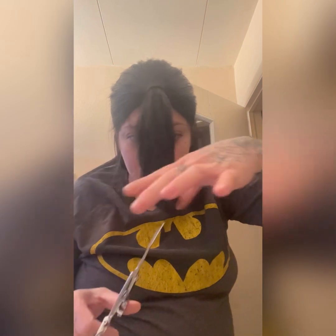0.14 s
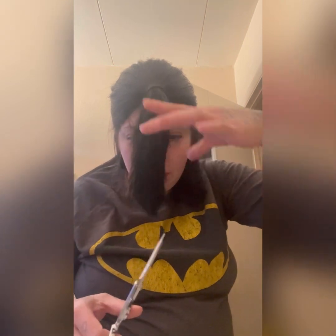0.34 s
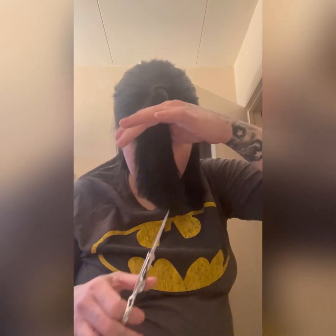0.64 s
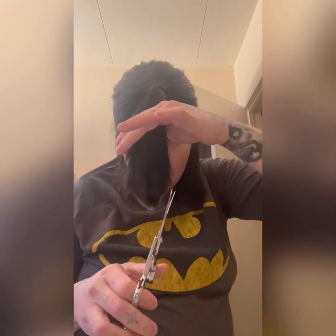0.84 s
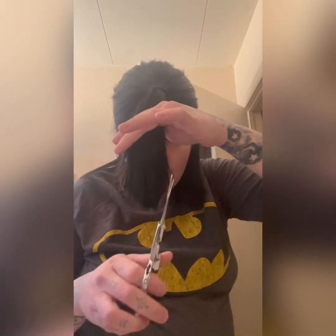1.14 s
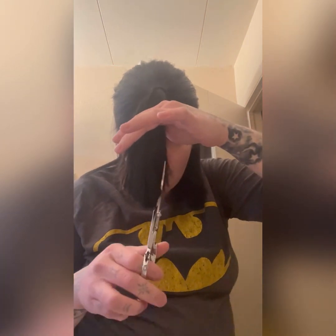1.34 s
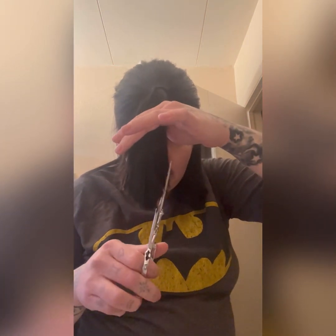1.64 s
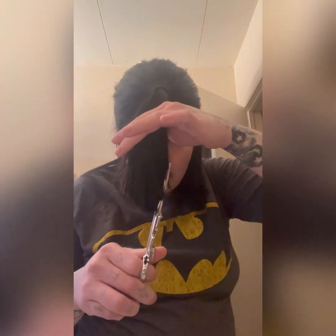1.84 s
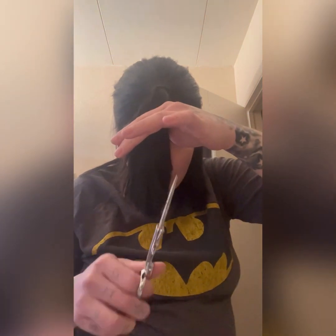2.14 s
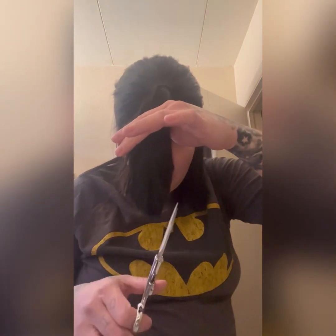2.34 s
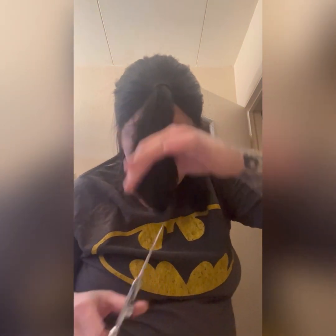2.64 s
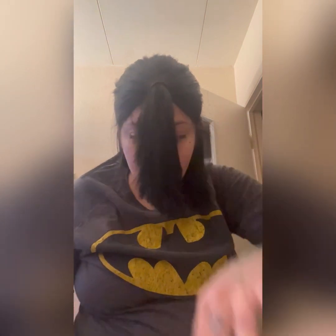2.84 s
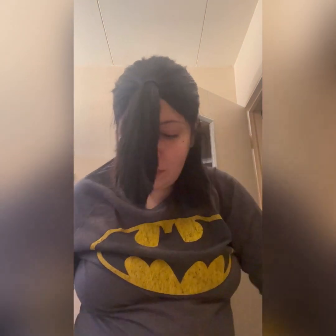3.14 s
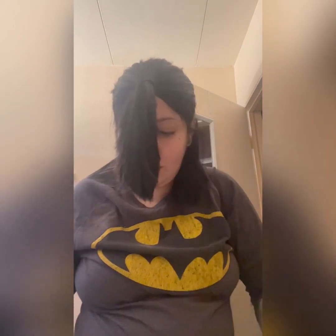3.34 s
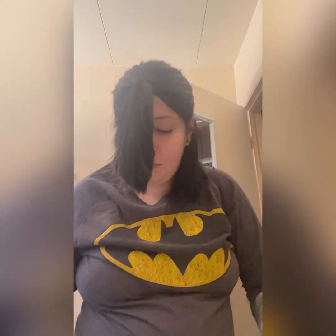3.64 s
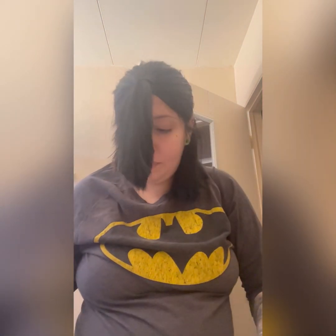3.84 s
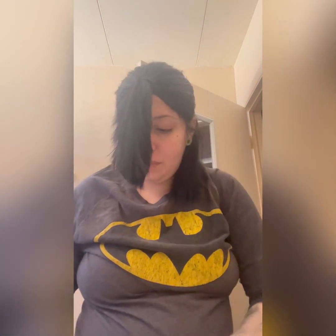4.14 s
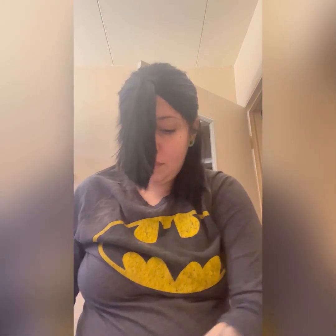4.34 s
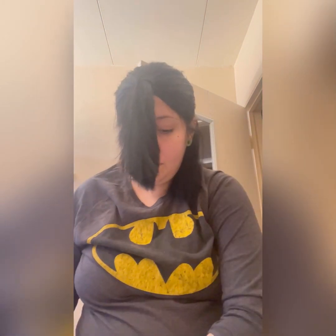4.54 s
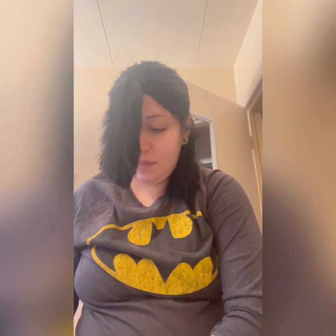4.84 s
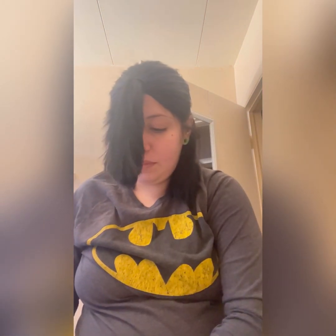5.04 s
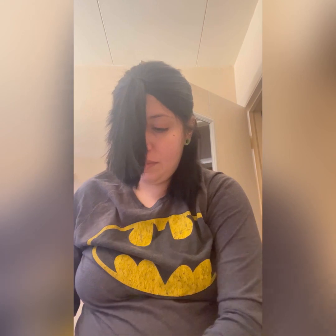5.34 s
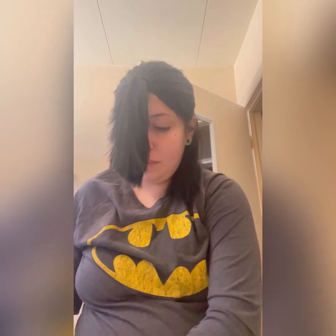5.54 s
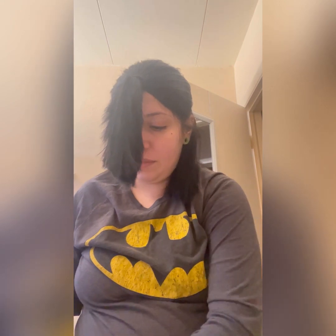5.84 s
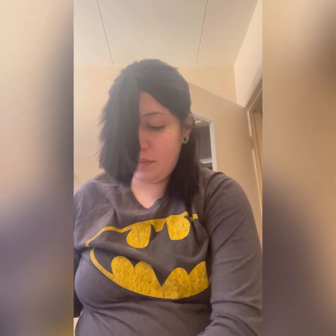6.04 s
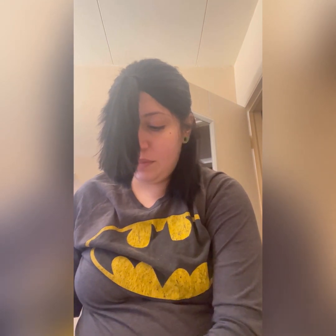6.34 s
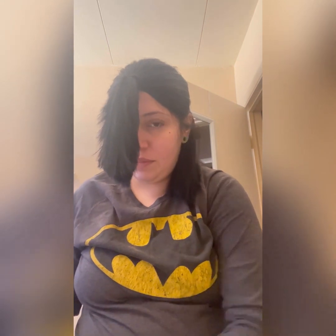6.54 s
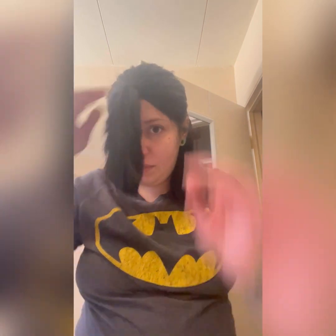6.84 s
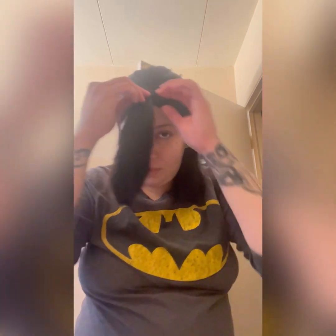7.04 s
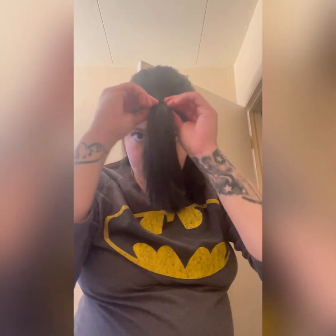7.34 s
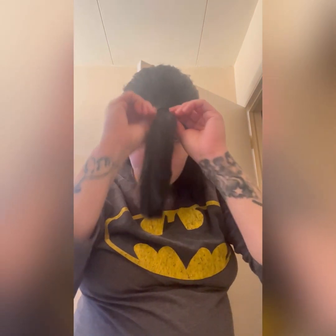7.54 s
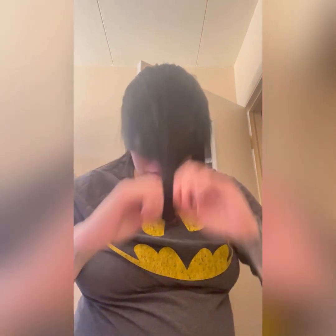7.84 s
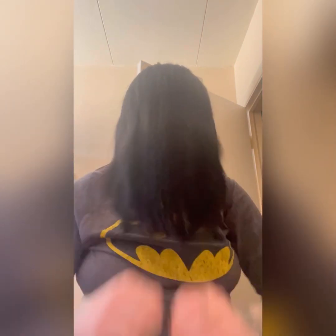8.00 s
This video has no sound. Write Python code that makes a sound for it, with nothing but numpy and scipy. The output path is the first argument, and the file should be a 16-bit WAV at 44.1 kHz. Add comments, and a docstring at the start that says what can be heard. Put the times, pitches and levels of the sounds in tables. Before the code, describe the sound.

Faint snipping of hair in a quiet bathroom, followed by loud close knocks and scrapes on a countertop, sleeve rustle and light hair smoothing.

```python
"""Scissors crunch slowly through a lock of hair and click shut in a small, quiet bathroom.
Random snaps make the crunch, gliding bands of noise the scrape, and struck steel modes the click.
Then hard things are put down and shifted on the counter where the phone stands: blows drive its modes.
Sleeves rustle and hands smooth the hair, both as filtered grains, and still air hisses softly.
A faint low hum, a sine with a weak third harmonic, wavers underneath and creeps up in pitch."""
import sys
import numpy as np
from scipy import signal
from scipy.fft import rfft, irfft
from scipy.io import wavfile
from scipy.ndimage import uniform_filter1d

SR = 44100
rng = np.random.default_rng(int(sys.argv[2]) if len(sys.argv) > 2 else 0)


def put_to_file(sound):
    """Save the sound as 16-bit audio at rate SR, in the file named by the first command-line argument."""
    columns = np.atleast_2d(sound).T  # one column per channel
    safe = np.clip(columns, -1, 1)
    whole_steps = np.round(safe * 32767)
    wavfile.write(sys.argv[1], SR, whole_steps.astype(np.int16))


N = 360297

# In spectra and modes, levels are relative: each source is scaled to its own level afterwards.

# level of the hum, joined by straight lines: (time [s], level [dB])
HUM_LEVEL = [(0.0, -61), (0.36, -58), (0.5, -62), (1.48, -55), (1.52, -69.5), (2.11, -56), (2.18, -70.5),
             (2.37, -57.5), (2.41, -77), (2.52, -54.5), (3.14, -73.5), (3.21, -57), (3.5, -60.5),
             (3.57, -77.5), (3.64, -61), (4.19, -70), (4.23, -77), (4.3, -61), (4.64, -59.5), (4.71, -80.5),
             (4.8, -57), (5.05, -68), (5.21, -63), (5.35, -75.5), (5.48, -56.5), (5.58, -71), (5.66, -52),
             (6.01, -73), (6.35, -54.5), (6.92, -68), (7.28, -59.5), (7.83, -65.5), (8.1, -58), (8.17, -67)]
# the hum's starting pitch, its climb and its random waver (rms)
HUM_HZ, HUM_RISE_HZ_PER_S, HUM_WAVER_HZ, HUM_WAVER_DB = 87.3, 2.4, 2.7, 1.5
# spectrum of the still air: (frequency [Hz], level [dB])
AIR_SPECTRUM = [(25, -9.5), (45, 0), (70, 9), (140, 4), (220, -9.5), (450, -14), (800, -24), (1300, -25),
                (1750, -26.5), (3000, -29), (6000, -35), (13000, -43.5), (15500, -58.5)]

# arm movements, each at its fastest:
# (time [s], attack [s], release [s], sleeve rub level [dB], body rumble level [dB])
ARM_MOVES = [(1.15, 0.44, 0.33, -97, -71.5), (1.32, 0.18, 0.59, -87.5, -77), (2.0, 0.51, 1.24, -98, -69),
             (2.85, 0.35, 0.27, -72, -76.5), (3.299, 0.13, 1.8, -62, -63.5), (3.698, .3, 1.1, -55, -68),
             (4.0, 0.75, 0.063, -60, -53.5), (4.401, 0.26, 0.48, -52, -54),
             (4.76, 0.43, 0.43, -61.5, -53.5), (5.5, 0.93, 0.84, -60, -54.5),
             (6.82, 0.43, 0.34, -58.5, -61), (7.28, 0.07, 1.02, -70, -60.5), (7.6, 0.47, 1.25, -58.5, -54),
             (8.09, 0.24, 0.25, -69.5, -55)]
REST_RUB_DB, REST_RUMBLE_DB = -89, -84  # while the arms are still
# spectrum of sleeves rubbing: (frequency [Hz], level [dB])
CLOTH_SPECTRUM = [(400, -4), (750, -3.5), (1100, -1.5), (1600, 6.5), (2000, 3), (2350, 6), (2750, -12.5),
                  (3500, -11.5), (5000, -22.5), (9000, -45), (15000, -35.5)]
# spectrum of the moving body's low rumble: (frequency [Hz], level [dB])
RUMBLE_SPECTRUM = [(25, -17), (65, 3), (130, -1), (200, -11.5), (285, 8), (350, -4), (520, -4), (750, -13),
                   (1200, -48)]
# a sleeve swishing past fast: (time [s], length [s], level [dB])
SWISHES = [(3.52, 0.049, -65), (6.78, 0.061, -82), (7.9, 0.11, -66.5)]
SWISH_ATTACK_S, SWISH_RELEASE_S = 0.2, 0.37
# spectrum of the swish's narrow hiss: (frequency [Hz], level [dB])
SWISH_SPECTRUM = [(1200, -27.5), (2300, -7), (2900, 6.5), (3400, 5.5), (3900, -16), (6000, -34)]

# the blades rubbing along the hair and each other:
# (time [s], length [s], start pitch [Hz], end pitch [Hz], level [dB])
SCRAPES = [(1.3, 0.051, 1650, 1420, -75.5), (1.42, .05, 1550, 1660, -85), (1.55, 0.077, 2050, 1864, -81.5),
           (1.575, .07, 6300, 6300, -86), (1.665, 0.053, 1743, 2055, -69), (1.675, .04, 6960, 7500, -78),
           (2.156, 0.063, 1820, 1700, -81), (2.823, .15, 1733, 1850, -77)]
SCRAPE_ATTACK_S, SCRAPE_RELEASE_S, SCRAPE_WIDTH_HZ = 0.034, 0.05, 310

# the blades pressing through a tuft: (time [s], length [s], level [dB])
CUTS = [(1.625, 0.023, -74), (1.68, 0.13, -76), (1.835, 0.016, -72.5), (1.925, 0.016, -62.5),
        (2.145, 0.019, -63.5)]
CUT_ATTACK_S, CUT_RELEASE_S = 0.023, 0.065
# spectrum of hair being cut: (frequency [Hz], level [dB])
CUT_SPECTRUM = [(400, -20), (1200, -11), (1600, 7), (2100, 10), (2700, -27), (3600, 6), (5000, -5.5),
                (7000, 0.5), (9000, -3), (11000, -3.5), (13500, 1.5), (15500, 1)]
# hair sliding through the fingers: (time [s], length [s], level [dB])
STROKES = [(2.922, 0.0087, -74.5), (2.99, 0.02, -60), (3.462, 0.011, -69.5), (7.015, 0.0042, -73.5),
           (7.07, .045, -79.5), (7.538, 0.0064, -61), (7.58, 0.26, -66.5), (7.78, 0.12, -63.5)]
STROKE_ATTACK_S, STROKE_RELEASE_S = 0.021, 0.044
# spectrum of hair being stroked: (frequency [Hz], level [dB])
STRAND_SPECTRUM = [(400, -56), (1300, 11), (2000, 16), (2800, 5.5), (3800, 16), (5200, 6.5), (7000, 6),
                   (9500, 4), (12000, 7), (15500, 5.5)]

# the blades catching and closing: (time [s], ring level [dB], hiss level [dB], chatter [s])
SNIPS = [(1.835, -63.5, -70, 0.026), (1.92, -56.5, -94, 0.017), (1.932, -64, -86, 0.012),
         (1.953, -62, -67, 0.0089), (1.975, -63, -65, 0.0027), (1.981, -55, -56, 0.008)]
# modes of the steel blades: (frequency [Hz], width [Hz], level [dB])
BLADE_MODES = [(1240, 50, 2), (1877, 33, 12), (2370, 330, 2), (3360, 680, 6.5), (6140, 470, -12),
               (10900, 300, -8), (13100, 320, -21)]

# things knocking on the counter: (time [s], thud level [dB], ring level [dB], crack level [dB],
# chatter [s], own note [Hz], own note level [dB])
KNOCKS = [(3.286, -73, -65, -105, 0.0043, 1930, -73), (3.505, -45.5, -39, -75, 0.0022, 2320, -44),
          (3.550, -54.5, -45, -80.5, 0.0046, 1940, -45), (3.582, -62, -53, -100, 0.0094, 940, -51),
          (3.626, -53.5, -64, -105, 0.0099, 466, -56), (3.701, -54.5, -69, -102, 0.0065, 2410, -56.5),
          (3.739, -49.5, -37.5, -59.5, 0.0084, 1220, -54), (3.7885, -42, -27, -37.5, 0.0022, 2353, -31.5),
          (3.795, -40, -29, -46.5, 0.0088, 868, -39), (3.812, -40, -47, -54, 0.0044, 1920, -39),
          (3.977, -75, -67.5, -105, 0.013, 442, -50.5), (3.997, -52.5, -55.5, -75, 0.0032, 2860, -57.5),
          (4.061, -57, -56.5, -100, 0.0055, 1390, -50.5), (4.078, -66, -67, -105, 0.0034, 1346, -55.5),
          (4.272, -43, -37, -56.5, 0.0085, 1662, -39), (4.387, -44, -37.5, -51.5, 0.0064, 810, -44),
          (4.459, -33, -11.5, -24, 0.0042, 2430, -38), (4.4671, -41, -25, -34, .0025, 3650, -40),
          (4.476, -39.5, -29, -39, 0.014, 2045, -27), (4.489, -38.5, -25.5, -44, 0.0053, 2150, -27.5),
          (4.536, -49.5, -53, -82, 0.017, 620, -42), (4.579, -59, -44.5, -82, 0.0078, 440, -52.5),
          (4.728, -65.5, -49, -90, 0.0029, 1510, -67), (4.926, -68.5, -68.5, -70, 0.0036, 1660, -57),
          (5.1735, -44, -32, -47, 0.0076, 822, -41), (5.180, -37.5, -24, -44, 0.011, 1712, -23),
          (5.35, -59, -50.5, -67, 0.016, 1310, -52), (5.379, -48, -36.5, -50.5, 0.011, 2230, -46),
          (5.412, -36.5, -28, -50, 0.0051, 2353, -32.5), (5.434, -48, -47, -58.5, 0.0092, 2060, -40),
          (5.463, -57, -45, -59, 0.0098, 1674, -40), (5.527, -42.5, -34.5, -45, 0.0082, 2370, -34.5),
          (5.585, -48.5, -42, -66, 0.0044, 1610, -39), (5.619, -51.5, -32, -53, 0.0077, 2440, -47.5),
          (5.742, -46.5, -33.5, -51.5, 0.009, 1570, -45), (5.762, -56, -37, -63, 0.004, 2200, -37),
          (5.841, -66, -49.5, -85, 0.011, 1800, -49), (7.265, -82.5, -69, -90, .008, 2063, -73),
          (7.691, -48, -55.5, -93, 0.0019, 560, -48), (7.692, -54, -62, -92.5, 0.0024, 1464, -49)]
# what the counter and the things on it ring with: (frequency [Hz], width [Hz], level [dB])
COUNTER_MODES = [(1634, 18, -12), (1702, 26, 1.5), (1738, 40, -3), (1834, 26, -9), (1866, 22, -14),
                 (2060, 12, -12), (2330, 85, -7.5), (2844, 260, -20.5), (3662, 40, -13.5),
                 (3890, 28, -24.5), (4119, 18, -25), (5315, 16, -22), (5820, 58, -33.5), (7060, 58, -26)]
# the duller modes of the counter top: (frequency [Hz], width [Hz], level [dB])
THUD_MODES = [(150, 22, -3), (278, 14, -12.5), (312, 14, -8), (398, 16, -3), (426, 23, -1.5),
              (480, 60, -6.5), (556, 11, -6.5), (640, 50, -7.5), (768, 99, 1.5), (826, 60, -3.5),
              (902, 45, -1.5), (1260, 25, -1)]
# spectrum of the crack of contact: (frequency [Hz], level [dB])
CRACK_SPECTRUM = [(300, -27.5), (1300, -15), (2400, -4.5), (3000, -2), (3800, 9.5), (5000, -4.5), (7000, 0),
                  (9000, -1), (12000, -12), (15500, -18.5)]
# spectrum of the fine tick of a hard edge: (frequency [Hz], level [dB])
TICK_SPECTRUM = [(1000, -45.5), (5000, -8), (7000, -3), (8800, 11.5), (10500, 9), (13000, -6.5),
                 (15500, -1.5)]
FIRST_TOUCH = .3  # a blow's first touch against the chatter after it
BOUNCES_PER_S, BOUNCE_DB, BOUNCE_FADE_S = 770, -28.5, 0.047  # rebounds after a blow
NOTE_WIDTH_HZ = 120  # damping of each thing's own note
HARD_BLOW_HZ, SOFTER_DB_PER_OCTAVE = 13000, 19.5  # the less a blow cracks, the duller it rings
# relative mode shifts (spread) with the grip and the place of each blow
BODY_DETUNE, THUD_DETUNE = 0.0049, .024
# tick against the crack of a firm blow; harder blows tick more (dB per dB)
TICK_DB, TICK_GROWTH, FIRM_CRACK_DB = -13.5, 0.35, -45

# fingers shuffling things about between the knocks: (time [s], length [s], level [dB])
FUMBLES = [(3.56, 0.19, -65.5), (3.75, 0.057, -56), (3.86, 0.064, -61.5), (4.55, 0.13, -60.5),
           (5.39, 0.15, -52.5)]
FUMBLE_ATTACK_S, FUMBLE_RELEASE_S = 0.025, 0.064
TAPS_PER_S, TAP_SPREAD_DB, TAP_RING_DB = 60, 1.5, -2  # the ring is relative to the thud

# a thing sticks and slips on the counter and sings: (time [s], length [s], pitch [Hz], level [dB])
SQUEAKS = [(4.458, .004, 1690, -36.5), (4.89, 0.0032, 1670, -57), (4.907, .014, 1695, -58),
           (4.925, .009, 1725, -49.5), (4.983, .08, 1682, -64), (5.031, .012, 1646, -54),
           (5.057, .012, 1663, -58.5), (5.128, .048, 1694, -42.5), (5.442, .05, 1681, -45.5),
           (5.871, 0.11, 1735, -54.5), (6.048, .04, 1700, -65.5)]
SQUEAK_ATTACK_S, SQUEAK_RELEASE_S = .014, .02
SQUEAK_JITTER_HZ, SQUEAK_FLUTTER_DB, SQUEAK_GRIT_DB = 16, 1.86, -21.5
# something dragged roughly over the counter: (time [s], length [s], level [dB])
DRAGS = [(5.125, 0.08, -51.5), (5.395, 0.12, -46), (5.64, 0.04, -54), (5.77, 0.088, -49),
         (5.87, 0.081, -51.5), (5.99, 0.13, -67.5)]
DRAG_ATTACK_S, DRAG_RELEASE_S, DRAG_ROUGH_DB = 0.014, 0.022, 2
# modes a dragged thing grinds with: (frequency [Hz], width [Hz], level [dB])
GRIND_MODES = [(535, 35, -9), (786, 50, -10), (930, 50, -14), (1315, 55, -0.5), (1700, 90, 3),
               (1811, 94, -2), (2060, 40, -8.5), (2330, 70, -8.5), (3660, 80, -30), (5340, 60, -30)]

# the room's ring: (frequency [Hz], t60 [s])
ROOM_T60 = [(120, 0.3), (400, 0.099), (1400, 0.23), (2800, 0.21), (6000, 0.3), (9000, 0.03), (14000, 0.11)]
# how the room colours its reflections of the counter: (frequency [Hz], level [dB])
ROOM_COLOUR = [(300, -2), (420, -2), (560, 6), (800, -1.5), (1250, 1.5), (1500, 0), (1730, -4), (2060, 3),
               (2400, 0.5), (4000, -3), (7000, 0.5), (12000, 7)]
# reverberation that reaches each microphone port on its own: (frequency [Hz], level [dB])
DIFFUSE_SPECTRUM = [(100, -14.5), (300, -17), (600, -9), (1600, -21), (3000, -11.5), (6000, -5),
                    (12000, -17)]
LINGER_DB, LINGER_T60_S, LINGER_SLOPE = -18, 0.15, .3  # t60 at 1 kHz, shorter higher up
# delay between the two microphone ports: (frequency [Hz], left's phase lead [radians])
PORT_PHASE = [(0, 0), (600, -2.1), (1210, -1.4), (2760, -2.2), (3270, -2.5), (3750, -2.5), (4350, -3.2),
              (5170, -4.5), (5860, -5.2), (6800, -4.8), (7750, -3.3), (10500, -2.9), (12500, -0.3),
              (15600, 0.3), (16200, -1.1)]
# balance of the two microphone ports: (frequency [Hz], left minus right [dB])
PORT_BALANCE = [(60, 3.5), (110, 4.0), (200, 6.0), (380, 4.0), (700, 5.5), (1290, 9.5), (1720, 11),
                (2380, 6.5), (4400, 1.5), (8120, 0.0), (15000, 0.0)]
TOP_HZ = 15800  # upper edge of the phone's band


def undb(db):
    """Decibels to gain."""
    return 10 ** (np.asarray(db) / 20)


def unit(x):
    """Scale to rms 1."""
    return x / np.sqrt(np.mean(x ** 2) + 1e-30)


def across(points, size):
    """Read (Hz, value) points at the bins of a transform, on a log frequency axis."""
    hz, value = np.transpose(points)
    bins = np.fft.rfftfreq(size, 1 / SR)
    return np.interp(np.log(bins + 1), np.log(hz + 1), value)


def colour(x, points):
    """Causal minimum-phase filter with a (Hz, dB) spectrum."""
    cepstrum = irfft(np.log(undb(across(points, size=2048))))
    # fold the cepstrum onto positive time
    cepstrum[1:1024] *= 2
    cepstrum[1025:] = 0
    response = irfft(np.exp(rfft(cepstrum)))
    return signal.fftconvolve(x, response)[:len(x)]


def above(x, hz):
    """High-pass: small things radiate little bass."""
    return signal.sosfilt(signal.butter(4, hz, "high", fs=SR, output="sos"), x)


def below(x, hz):
    """Low-pass: a soft contact excites little treble."""
    return signal.sosfilt(signal.butter(3, min(hz, 16000), fs=SR, output="sos"), x)


def walk(rate):
    """Slow random wander of rms 1, with rate fresh steps a second."""
    k = int(SR / rate)
    steps = np.repeat(rng.standard_normal(N // k + 1), k)
    return unit(uniform_filter1d(steps, k)[:N])


def grains(rate, spread_db):
    """Tiny random clicks, rate a second on average, of uneven size."""
    size = undb(spread_db * np.minimum(rng.exponential(size=N), 4))
    clicks = (rng.random(N) < rate / SR) * rng.choice([-1, 1], N)
    return unit(clicks * size)


def swell(s, attack, hold, release):
    """Gain of one movement: gains 20 dB per attack time up to s, holds, loses 20 dB per release time."""
    t = np.arange(N) / SR - s
    away = np.maximum(-t, 0) / attack + np.maximum(t - hold, 0) / release
    return undb(-20 * np.minimum(away, 10))


def gestures(rows, attack, release):
    """Gain of a run of (s, length, dB) movements that share an attack and a release."""
    return np.max([undb(db) * swell(s, attack, length, release) for s, length, db in rows], axis=0)


def ring(push, modes, scatter_db=0, detune=0):
    """Drive damped resonances; dB is each one's level, which scatters like the pitch from blow to blow."""
    t = np.arange(min(len(push), SR // 2)) / SR
    out = 0
    for (hz, width, db), (place, shift) in zip(modes, rng.standard_normal((len(modes), 2))):
        mode = np.exp(-np.pi * width * t) * np.sin(2 * np.pi * hz * (1 + detune * shift) * t)
        driven = unit(signal.fftconvolve(push, mode)[:len(push)])
        out = out + undb(db + scatter_db * place) * driven
    return out


def note(push, hz, width_hz):
    """One short resonance, rung twice over for steep flanks."""
    mode = [(hz, width_hz, 0)]
    return ring(ring(push, mode), mode)


def contact(chatter, first):
    """A first touch, then a dying chatter of small ones that lasts no less than 3 ms."""
    t = np.arange(SR // 4) / SR
    touches = rng.standard_normal(len(t)) * (rng.random(len(t)) < .25)
    push = touches * np.exp(-(t / max(chatter, .003)) ** 2)
    push /= np.linalg.norm(push)
    push[0] += first
    return push


def burst(x, db):
    """Scale a hit so that its energy equals 20 ms at the given level."""
    return x * undb(db) * np.sqrt(SR / 50 / np.sum(x ** 2))


def add(track, s, x):
    """Mix x into the track at time s."""
    i = int(s * SR)
    track[i:i + len(x)] += x[:N - i]


def hum():
    """A low wavering tone with a weak third harmonic swells and fades beside a faint mains line."""
    t = np.arange(N) / SR
    pitch = HUM_HZ + HUM_RISE_HZ_PER_S * t + HUM_WAVER_HZ * walk(16)
    phase = 2 * np.pi * np.cumsum(pitch) / SR
    tone = np.sin(phase) + undb(-26.5) * np.sin(3 * phase)
    level_db = np.interp(t, *np.transpose(HUM_LEVEL)) + HUM_WAVER_DB * walk(35)
    mains = np.sin(2 * np.pi * 120 * t)
    return unit(tone) * undb(level_db) + undb(-73.0) * mains


def sleeves():
    """Each arm movement rubs cloth in fine, uneven grains over a soft rumble; fast passes swish higher."""
    rub_gain, rumble_gain = undb(REST_RUB_DB), undb(REST_RUMBLE_DB)
    for s, attack, release, rub_db, rumble_db in ARM_MOVES:
        speed = swell(s, attack, 0, release)
        # overlapping movements add in energy
        rub_gain = np.hypot(rub_gain, undb(rub_db) * speed)
        rumble_gain = np.hypot(rumble_gain, undb(rumble_db) * speed)
    fibres = grains(rate=2500, spread_db=3) * undb(2 * walk(30))
    rub = unit(colour(fibres, CLOTH_SPECTRUM)) * rub_gain
    swish = unit(colour(rng.standard_normal(N), SWISH_SPECTRUM))
    swish = swish * gestures(SWISHES, SWISH_ATTACK_S, SWISH_RELEASE_S)
    rumble = unit(colour(rng.standard_normal(N), RUMBLE_SPECTRUM)) * undb(0.5 * walk(31))
    return rub + swish + rumble * rumble_gain


def scraping():
    """The open blades rub in uneven catches; the pitch glides as the contact moves."""
    t = np.arange(N) / SR
    damping = signal.butter(2, SCRAPE_WIDTH_HZ / 2, fs=SR, output="sos")
    catches = grains(rate=900, spread_db=3) * undb(3 * walk(45))
    catches = unit(signal.sosfilt(damping, catches))
    out = 0
    for s, length, start_hz, end_hz, db in SCRAPES:
        pitch = np.interp(t, [s, s + length], [start_hz, end_hz])
        # the sine carries the slow catches up to the scrape's pitch
        scrape = unit(catches * np.sin(2 * np.pi * np.cumsum(pitch) / SR))
        out = out + scrape * undb(db) * swell(s, SCRAPE_ATTACK_S, length, SCRAPE_RELEASE_S)
    return out


def hair():
    """Single hairs snap between the blades; stroked strands give a finer hiss."""
    snaps = grains(rate=1300, spread_db=3) * undb(2 * walk(60))
    strands = grains(rate=5000, spread_db=3) * undb(1.8 * walk(90))
    crunch = unit(colour(snaps, CUT_SPECTRUM)) * gestures(CUTS, CUT_ATTACK_S, CUT_RELEASE_S)
    stroking = unit(colour(strands, STRAND_SPECTRUM))
    return crunch + stroking * gestures(STROKES, STROKE_ATTACK_S, STROKE_RELEASE_S)


def scissors():
    """Edge grates on edge in short catches and the blades ring, with a hiss coloured like cut hair."""
    out = np.zeros(N)
    for s, ring_db, hiss_db, chatter in SNIPS:
        push = contact(chatter, first=0.16)
        add(out, s, burst(above(ring(push, BLADE_MODES), hz=930), ring_db))
        add(out, s, burst(colour(push, CUT_SPECTRUM), hiss_db))
    return out


def bounces():
    """A blow is followed by a few faint, uneven rebounds, none in the first 12 ms."""
    t = np.arange(SR // 4) / SR
    taps = rng.standard_normal(len(t)) * (rng.random(len(t)) < BOUNCES_PER_S / SR) * (t > .012)
    return undb(BOUNCE_DB) * taps * np.exp(-t / BOUNCE_FADE_S)


def rattle(push, width_hz, count):
    """Many short high modes of a small hard thing; every blow picks out other ones."""
    t = np.arange(SR // 10) / SR
    hz, size = rng.uniform(2000, 16000, (count, 1)), rng.standard_normal((count, 1))
    modes = np.sum(size * np.sin(2 * np.pi * hz * t), axis=0) * np.exp(-np.pi * width_hz * t)
    return signal.fftconvolve(push, modes)[:len(push)]


def counter():
    """Hard things land with a brief chatter: a thud, a ringing body, a note of their own, crack and tick."""
    out = np.zeros(N)
    for s, thud_db, ring_db, crack_db, chatter, note_hz, note_db in KNOCKS:
        push = contact(chatter, first=FIRST_TOUCH) + bounces()
        clatter = rattle(push, width_hz=150, count=260)
        tick_db = crack_db + TICK_DB + TICK_GROWTH * (crack_db - FIRM_CRACK_DB)
        bright_hz = HARD_BLOW_HZ * 2 ** ((crack_db - ring_db) / SOFTER_DB_PER_OCTAVE)
        body = above(ring(push, COUNTER_MODES, scatter_db=1.5, detune=BODY_DETUNE), hz=1610)
        thud = above(ring(push, THUD_MODES, scatter_db=3, detune=THUD_DETUNE), hz=170)
        add(out, s, burst(below(body, hz=bright_hz), ring_db))
        add(out, s, burst(below(thud, hz=1400), thud_db))
        add(out, s, burst(note(push, note_hz, NOTE_WIDTH_HZ), note_db))
        add(out, s, burst(colour(clatter, CRACK_SPECTRUM), crack_db))
        add(out, s, burst(colour(clatter, TICK_SPECTRUM), tick_db))
    return out


def fumbling():
    """Light taps fall at random while things are handled, into the same counter."""
    taps = grains(rate=TAPS_PER_S, spread_db=TAP_SPREAD_DB)
    thud = unit(above(ring(taps, THUD_MODES), hz=230))
    body = unit(below(ring(taps, COUNTER_MODES), hz=3500))
    return (thud + undb(TAP_RING_DB) * body) * gestures(FUMBLES, FUMBLE_ATTACK_S, FUMBLE_RELEASE_S)


def sliding():
    """Irregular catches grind a dragged thing; regular stick and slip makes it sing, each push at its pitch."""
    slips = grains(rate=1300, spread_db=2.0) * undb(DRAG_ROUGH_DB * walk(70))
    grind = unit(below(above(ring(slips, GRIND_MODES), hz=400), hz=4200))
    s, length, hz, db = np.transpose(SQUEAKS)
    pitch = np.interp(np.arange(N) / SR, s + length / 2, hz) + SQUEAK_JITTER_HZ * walk(150)
    tone = unit(np.sin(2 * np.pi * np.cumsum(pitch) / SR)) * undb(SQUEAK_FLUTTER_DB * walk(90))
    squeak_gain = gestures(np.c_[s, length, db], SQUEAK_ATTACK_S, SQUEAK_RELEASE_S)
    squeak = (tone + undb(SQUEAK_GRIT_DB) * grind) * squeak_gain
    return squeak + grind * gestures(DRAGS, DRAG_ATTACK_S, DRAG_RELEASE_S)


def room(x):
    """Dense reflections from near walls: noise in bands, each dying at its own rate."""
    t = np.arange(SR) / SR
    hz, t60 = np.transpose(ROOM_T60)
    noise, tail = rfft(rng.standard_normal(SR)), 0
    for share, decay in zip(np.eye(len(hz)), t60):
        band = irfft(noise * across(np.c_[hz, share], size=SR), SR)
        tail = tail + band * np.exp(-np.log(1000) * t / decay)
    tail = tail * (1 - np.exp(-(t / 0.00031) ** 2))  # builds up within a millisecond
    return signal.fftconvolve(x, tail / np.linalg.norm(tail))[:N]


def lingering():
    """Impulse response of scattered resonances of the room and the things in it."""
    t = np.arange(SR) / SR
    place, turn, size = rng.random((90, 3)).T[:, :, None]
    hz = 300 * 20 ** place  # 300 to 6000 Hz
    t60 = LINGER_T60_S * (1000 / hz) ** LINGER_SLOPE
    waves = size * np.sin(2 * np.pi * (hz * t + turn))
    modes = np.sum(waves * np.exp(-np.log(1000) * t / t60), axis=0)
    return undb(LINGER_DB) * modes / np.linalg.norm(modes)


def ports(x):
    """Two microphone ports hear the sound a little apart in time, the left louder below the high treble."""
    turn = np.interp(np.fft.rfftfreq(N, 1 / SR), *np.transpose(PORT_PHASE))
    lean = across(PORT_BALANCE, size=N)
    right = irfft(rfft(x) * undb(-lean) * np.exp(-1j * turn), N)
    return np.array([x, right])


def scene():
    """All sources in the room, over still air; each port has some reverberation and hiss of its own."""
    person = sleeves() + scraping() + hair() + scissors()
    knocks = counter() + fumbling() + sliding()
    wet = undb(-12.5) * room(colour(knocks, ROOM_COLOUR)) + undb(-20.0) * room(person)
    wet = wet + signal.fftconvolve(knocks, lingering())[:N]
    diffuse = np.array([room(colour(knocks + person, DIFFUSE_SPECTRUM)) for _ in range(2)])
    air = [unit(colour(rng.standard_normal(N), AIR_SPECTRUM)) for _ in range(3)]
    hiss = above(np.array(air[:2]), hz=148)
    shared = knocks + person + wet + hum() + undb(-69.5) * air[2]
    return ports(shared) + diffuse + undb(-71) * hiss


def record(dry):
    """The phone holds peaks at full scale and cuts the top."""
    held = np.clip(dry, -1, 1)
    return signal.sosfilt(signal.ellip(10, .2, 80, TOP_HZ, fs=SR, output="sos"), held)


dry = scene()
out = record(dry)
put_to_file(out)
```